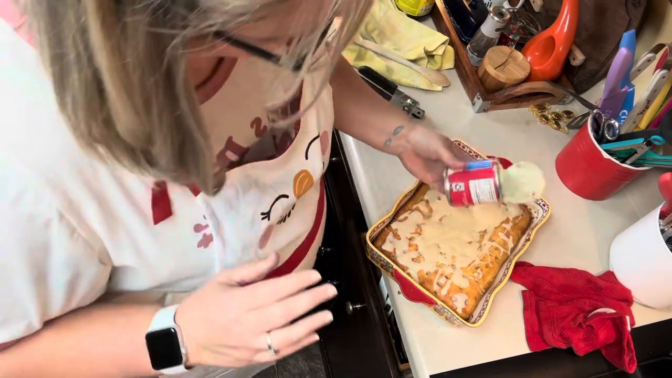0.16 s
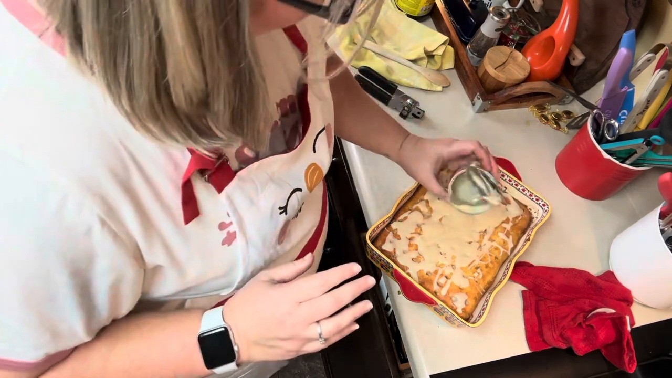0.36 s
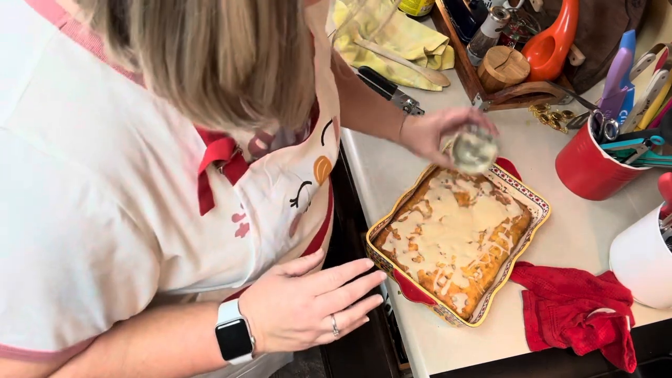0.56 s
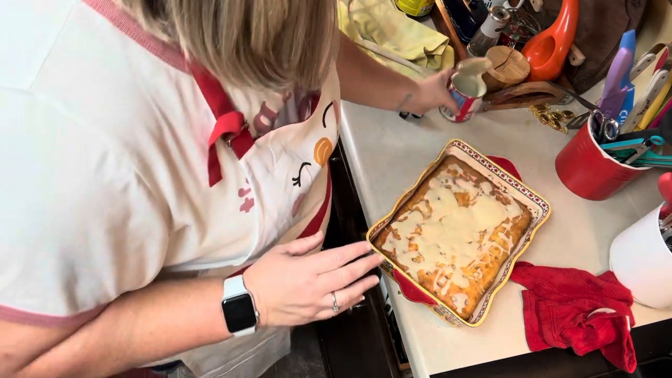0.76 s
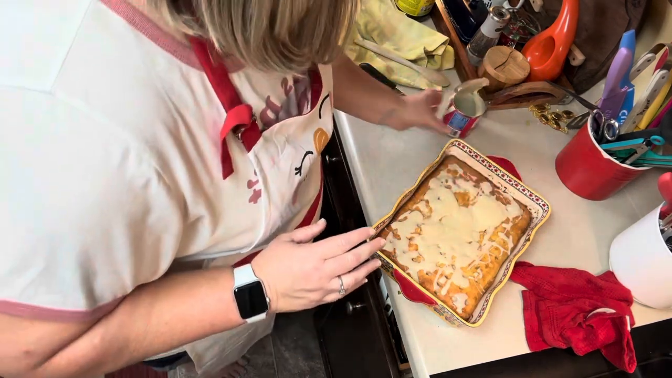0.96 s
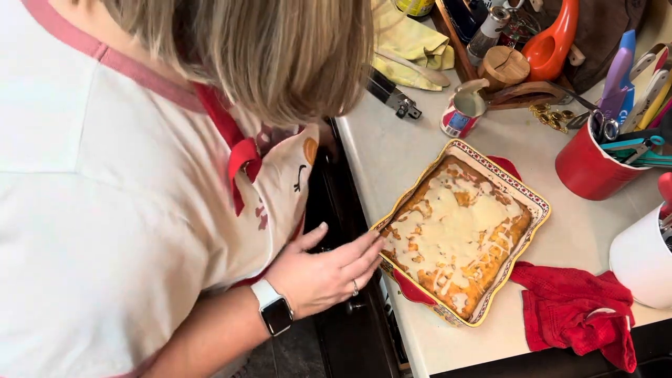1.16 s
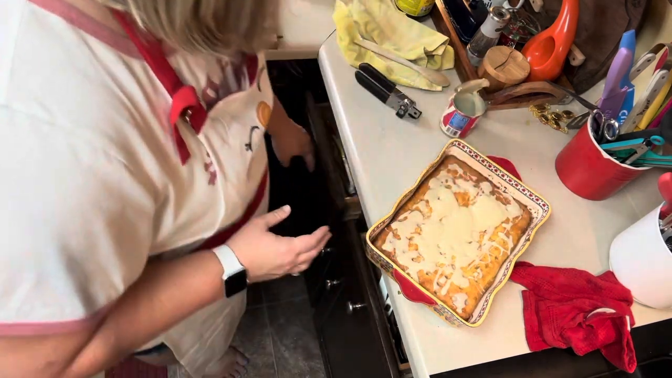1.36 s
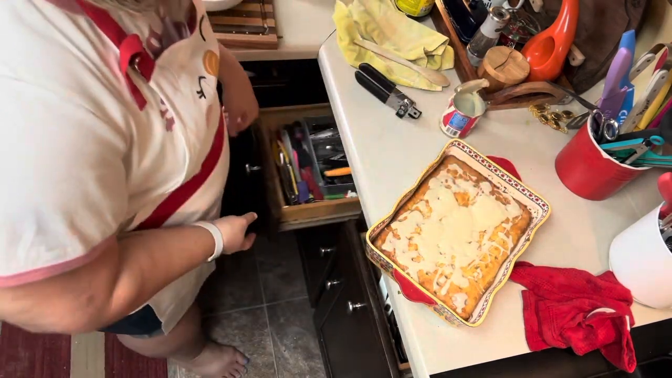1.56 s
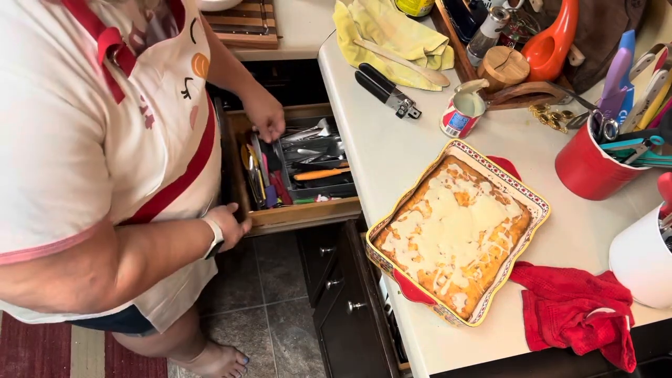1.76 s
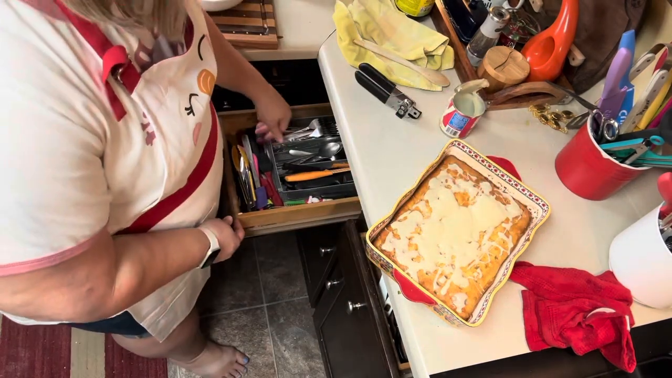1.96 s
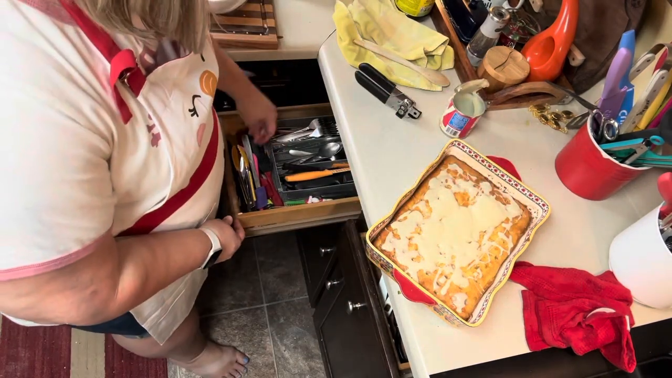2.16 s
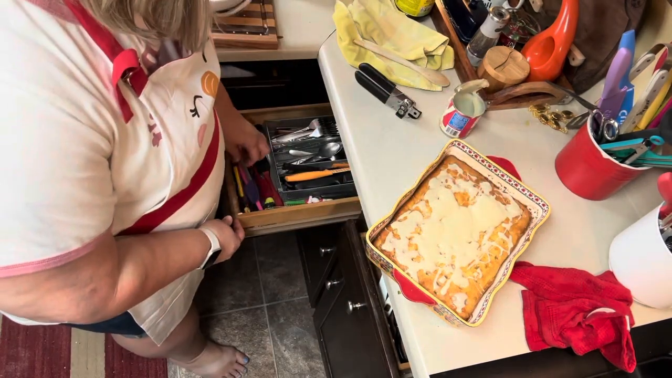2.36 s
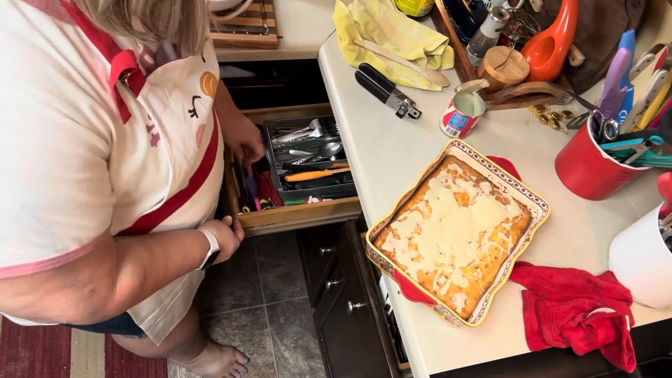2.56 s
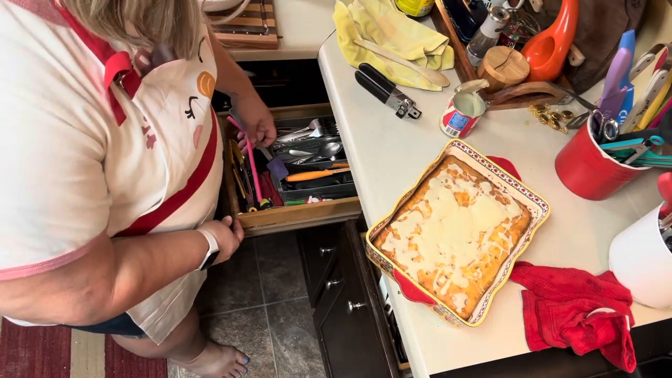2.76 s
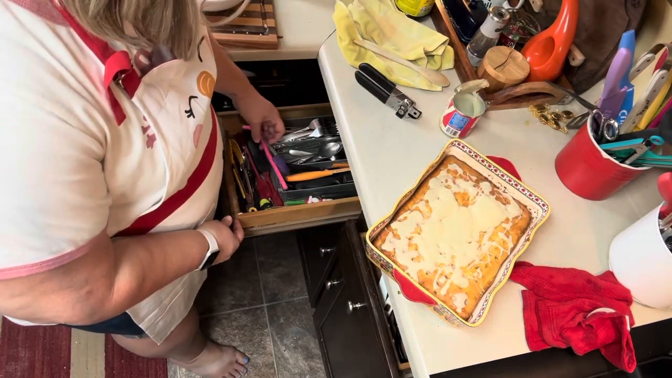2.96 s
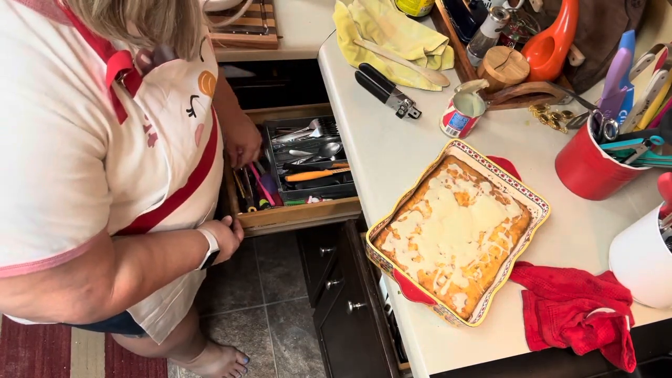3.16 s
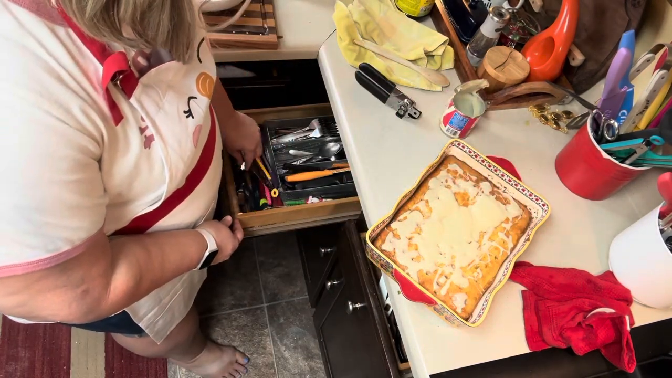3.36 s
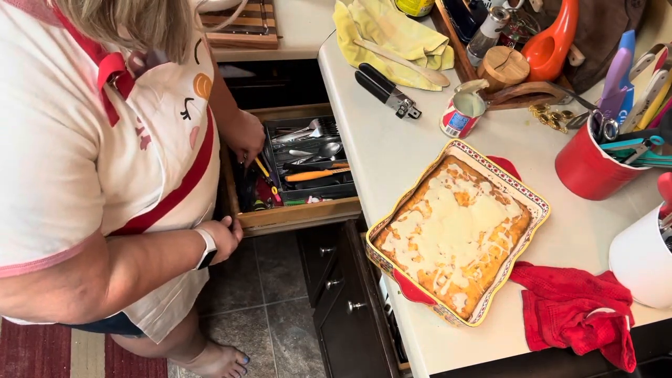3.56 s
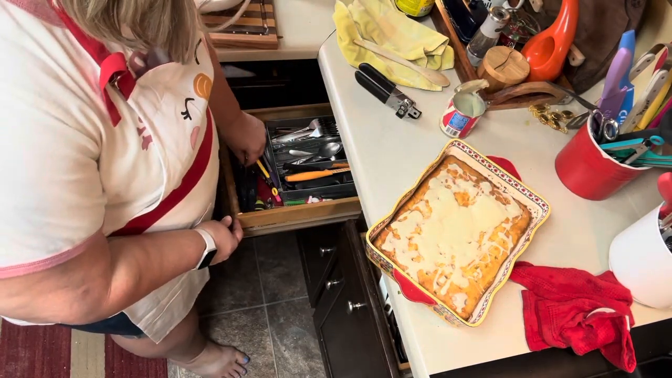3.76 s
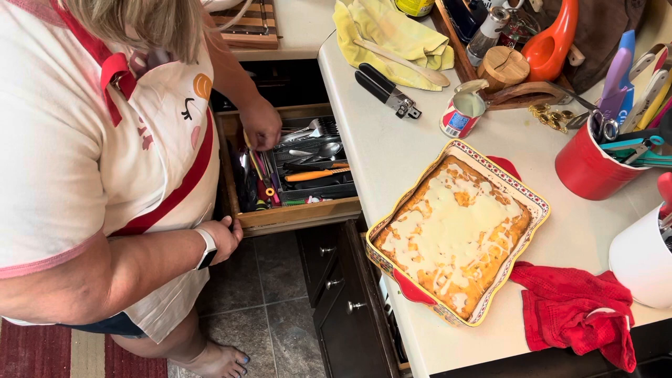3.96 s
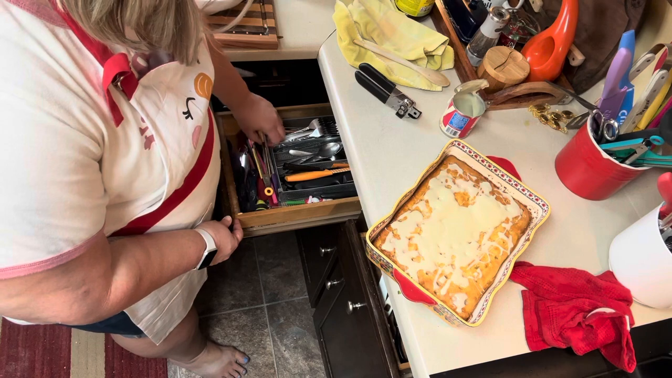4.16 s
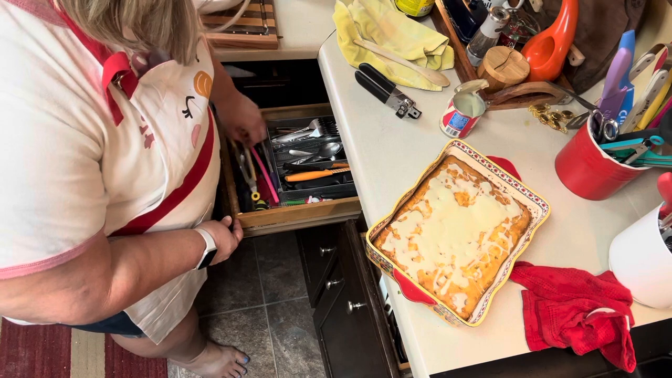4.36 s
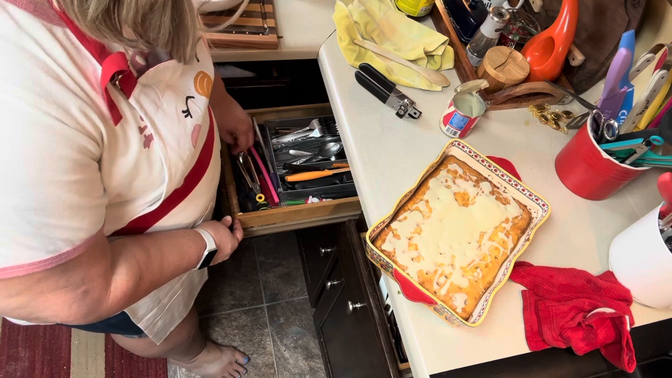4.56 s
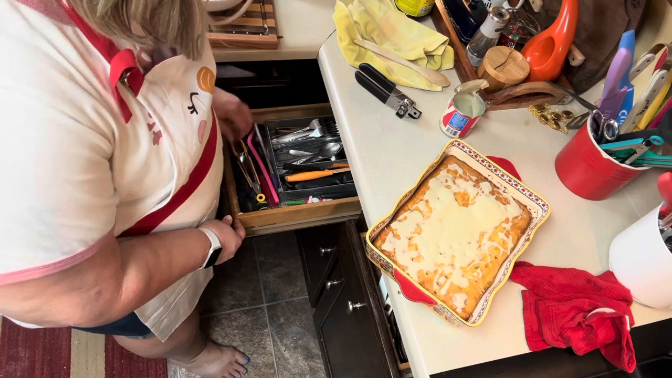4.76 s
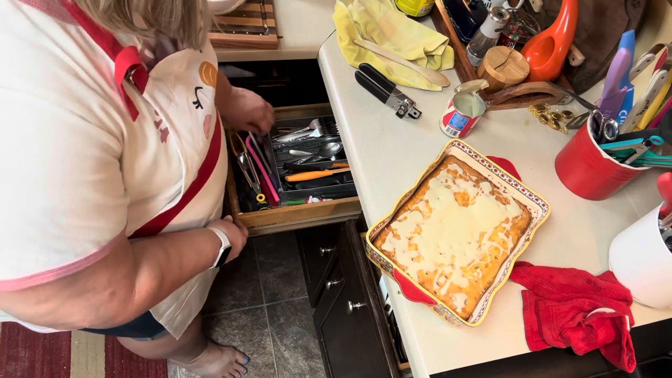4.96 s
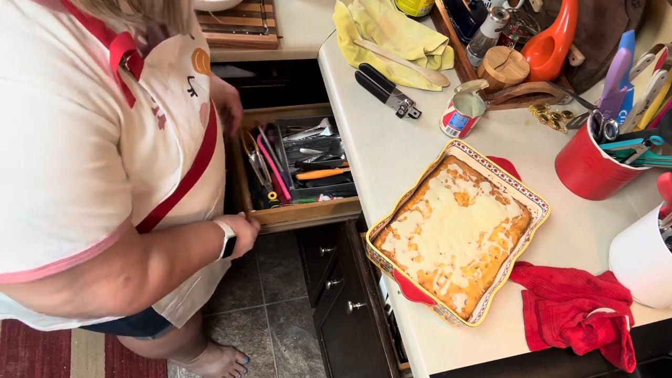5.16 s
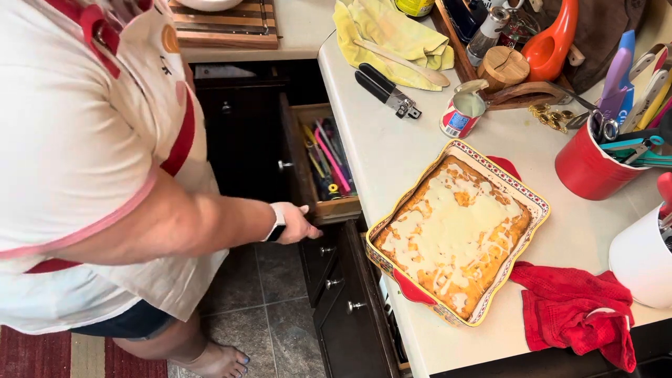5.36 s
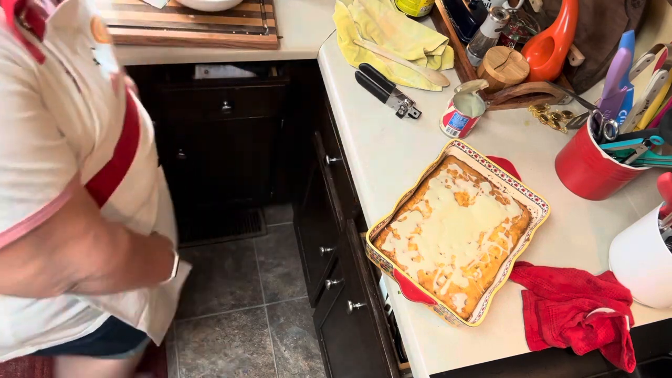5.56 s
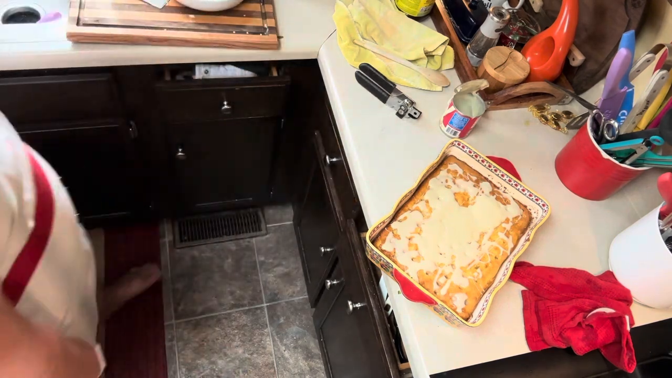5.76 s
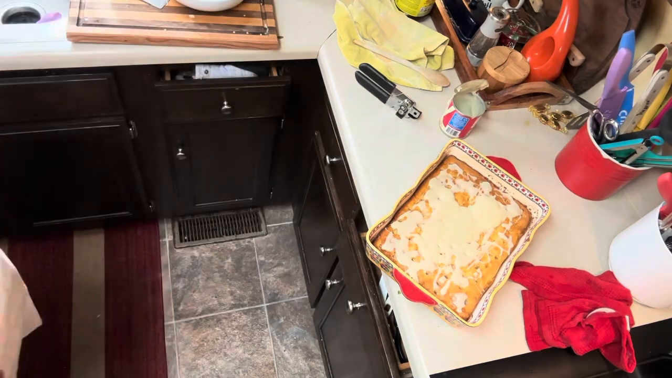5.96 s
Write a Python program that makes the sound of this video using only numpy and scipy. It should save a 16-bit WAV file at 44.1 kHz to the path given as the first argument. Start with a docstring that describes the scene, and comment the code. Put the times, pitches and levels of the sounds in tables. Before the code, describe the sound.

Kitchen drawer rummaging: a can knocks down, rollers rumble, cutlery rattles in uneven flurries, and a wooden drawer bangs shut with a boom.

```python
"""A hand rummages through metal and plastic utensils in a drawer tray, in a kitchen heard from a phone.
Before that a tin can is set down and the drawer rolls open; afterwards it is pushed shut with a slam.
Metal is a set of fading sine tones; knocks, scrapes and rustles are runs of tiny random clicks, filtered.
Soft steps and a shuffle go by. The small room answers every knock over a soft hum and hiss."""
import sys
import numpy as np
from scipy import signal
from scipy.fft import rfft, irfft, next_fast_len
from scipy.io import wavfile
from scipy.ndimage import uniform_filter1d

SR = 44100
rng = np.random.default_rng(int(sys.argv[2]) if len(sys.argv) > 2 else 0)


def persist_wave(psi):
    """Save psi, clipped to +-1, as 16-bit WAV."""
    counts = np.round(np.clip(psi, -1, 1) * 32767).astype(np.int16)
    wavfile.write(sys.argv[1], SR, np.atleast_2d(counts).T)


N = 265522  # length of the scene in samples
T = np.arange(SR // 4) / SR  # time within one knock, in seconds


def undb(db):
    """Turn decibels into a gain."""
    return 10 ** (np.asarray(db) / 20)


def unit(x):
    """Scale a sound to unit energy."""
    return x / np.sqrt(np.sum(x ** 2))


def blow(x, db):
    """Give a knock the energy of 10 ms of sound at the given level."""
    return unit(x) * undb(db) * np.sqrt(SR / 100)


def stroke(x, db, length_s):
    """Give a longer rub the energy of length_s seconds of sound at the given level."""
    return unit(x) * undb(db) * np.sqrt(abs(length_s) * SR)


def fade(t60):
    """Die away exponentially, by 60 dB in t60 seconds."""
    return np.exp(-np.log(1000) * T / max(t60, 1e-4))


def on_bins(points, size):
    """Read a (pitch_hz, value) curve at every frequency of a transform."""
    hz, value = np.transpose(points)
    bins_hz = np.arange(size // 2 + 1) * SR / size
    return np.interp(np.log(bins_hz + 1e-3), np.log(hz), value)


def colour(x, points):
    """Filter a sound to a (pitch_hz, level_db) curve, with no echo ahead of the sound."""
    size = 2 * next_fast_len(len(x) // 2 + 2048)
    # folding the cepstrum makes the filter causal
    cepstrum = irfft(np.log(undb(on_bins(points, size))))
    cepstrum[1:size // 2] *= 2
    cepstrum[size // 2 + 1:] = 0
    return irfft(rfft(x, size) * np.exp(rfft(cepstrum)))[:len(x)]


def convolve(x, response):
    """Pass a sound through a response, keeping its length."""
    return signal.fftconvolve(x, response)[:len(x)]


def add(track, s, sound):
    """Lay a sound into a track at time s in seconds."""
    start = int(s * SR)
    track[start:start + len(sound)] += sound[:N - start]


def ring(modes, scatter_db=0, detune=0, in_phase=False):
    """Sum fading tones; the point of contact changes their weights, the piece struck their pitch."""
    out = 0
    for k, (hz, db, t60) in enumerate(modes):
        weight, shift = rng.standard_normal(2)
        sign = 1 if in_phase else (-1) ** k
        tone = np.sin(2 * np.pi * hz * (1 + detune * shift) * T)
        out = out + sign * undb(db + scatter_db * weight) * fade(t60) * tone
    return out


def grains(size, spread_db):
    """Make dense tiny clicks of very uneven strength."""
    extra = np.minimum(rng.exponential(size=size), 5)
    return rng.standard_normal(size) * undb(spread_db * extra)


def even(x, width_hz):
    """Level the broad peaks and dips of a burst's spectrum, so that it is white."""
    power = uniform_filter1d(np.abs(rfft(x)) ** 2, max(int(width_hz * len(x) / SR), 1))
    hz = (np.arange(len(power)) + .5) * SR / len(x)
    return colour(x, np.column_stack([hz, -10 * np.log10(power / power.mean() + 1e-6)]))


def burst(t60):
    """Make a quick run of tiny contacts that dies away."""
    return even(grains(len(T), 1.5) * fade(t60), 400)


def focus(x, hz, focus_db):
    """Favour the range around a pitch: big pieces speak low, small ones high."""
    return colour(x, [(hz / 3, -focus_db), (hz, 0), (hz * 3, -2 * focus_db)])


def radiate(x, hz):
    """Cut the bass: a small object hardly radiates below its lowest modes."""
    return signal.sosfilt(signal.butter(2, hz, "high", fs=SR, output="sos"), x)


def thump(t60, hz):
    """Make a dead knock with no note of its own."""
    return radiate(focus(burst(t60), hz, 15), hz / 2)


def push(length_s):
    """Force of a contact, rising and falling: the longer it lasts, the less treble it excites."""
    return np.sin(np.pi * np.clip((T + 1 / SR) / max(length_s, 4 / SR), 0, 1))


def chatter(length_s, count=5):
    """One firm contact and weaker rebounds at random moments."""
    contacts = np.zeros(len(T))
    delay = rng.exponential(size=count)
    place = np.minimum(delay * abs(length_s) * SR, len(T) - 1).astype(int)
    contacts[place] = 0.65 * rng.standard_normal(count) * np.exp(-delay / 2)
    contacts[0] = 1
    return contacts


def walk(rate):
    """Wander slowly at random, about rate new values a second, with a spread of 1."""
    k = int(SR / rate)
    w = uniform_filter1d(np.repeat(rng.standard_normal(N // k + 1), k), k)[:N]
    return w / w.std()


# tones of the utensils, before scatter and damping: pitch_hz, relative level_db, t60_s
UTENSIL_MODES = [(1399.9, -8, 0.0657), (1610.6, -3, 0.041), (1747, 6, 0.064), (1834, 0.5, 0.1),
                 (2070, 2, 0.0306), (2440, 0, 0.08), (2863, 7, 0.053), (3340, -9, 0.016), (3875, 6, 0.049),
                 (4640, 3, 0.11), (5060, 3, 0.11), (5504, -12.5, 0.18), (7900, -2, 0.051)]
# thin tines and blades ring high above the rest: pitch_hz, relative level_db, t60_s
TINE_MODES = [(8000, 0, .13), (8550, -4, .12), (11800, 3, .13), (12450, -3, .09)]
# tones of the tray and the drawer bottom: pitch_hz, relative level_db, t60_s
TRAY_MODES = [(590, -1, 0.12), (683.5, 3.5, 0.096), (864, -2.5, 0.09703), (986, 3.5, 0.11),
              (1090, 3.5, 0.073), (1160, -21, 0.031)]
# colour of a plastic handle's clack: pitch_hz, relative level_db
CLACK = [(400, -36.5), (1000, -0.5), (1800, 3), (3000, -3), (4600, 3), (5600, 1.5), (7000, -19),
         (13000, -5), (16000, -26)]
# colour of an edge's tick: pitch_hz, relative level_db
TICK = [(1000, -26.5), (3000, -6), (5000, -8), (6500, -9), (9000, -7.5), (13000, -1), (14500, -13.5),
        (16000, -47)]
# the tray knocks under every clink, harder under the big, low pieces:
# level against the ring at TRAY_HZ, and its slope
TRAY_HZ, TRAY_DB, TRAY_DB_PER_OCTAVE = 2465.8, -20, -6


def clink(ring_db, hz, edge_db, metal_db=-16, clack_db=-13, tone_db=-17, tone_t60=.025, tick_db=-1,
          tines_db=-10, snap_db=7, clack_t60=0.026, chatter_s=.004, focus_db=9):
    """Pieces lying on each other ring only briefly; their edges tick and the tray under them knocks."""
    contacts = chatter(chatter_s)
    edge = fade(.035) + undb(snap_db) * fade(.003)
    tines = ring(TINE_MODES, scatter_db=5, detune=.012)
    metal = focus(ring(UTENSIL_MODES, scatter_db=3.5, detune=.035), hz, focus_db)
    # plastic handles give a dead clack in the same range
    clack = focus(colour(grains(len(T), 2.9) * fade(clack_t60), CLACK), hz, focus_db)
    tray = radiate(ring(TRAY_MODES, scatter_db=2, detune=.05, in_phase=True), 480)
    tick = colour(grains(len(T), 2.2) * edge, TICK)
    knock_db = ring_db + TRAY_DB + TRAY_DB_PER_OCTAVE * np.log2(hz / TRAY_HZ)
    # a short tone at the centre of the piece's ring
    tone = ring([(hz, 0, tone_t60)])
    layers = [
        (tone, ring_db + tone_db),
        (metal, ring_db + metal_db),
        (clack, ring_db + clack_db),
        (tray, knock_db),
        (tick, edge_db + tick_db),
        (tines, edge_db + tines_db),
    ]
    return sum(blow(convolve(contacts, sound), db) for sound, db in layers)


# one utensil strikes another; clink() offsets each layer from these levels:
# start_s, ring_db, pitch_hz (centre of the ring), edge_db
CLINKS = [(1.2718, -39, 4360, -68), (1.913, -42, 2100, -62), (2.2323, -36, 1170, -52),
          (2.2465, -28.5, 4205, -50), (2.305, -32, 2650, -47), (2.3473, -33, 6000, -37),
          (2.36, -27.5, 2840, -40), (2.373, -28, 1687, -41.5), (2.385, -29, 3500, -41),
          (2.3979, -30, 1500, -43), (2.606, -32, 5500, -52), (2.6475, -41.5, 1700, -49),
          (3.0606, -37, 900, -51), (3.169, -28.5, 2600, -42.5), (3.174, -29, 4900, -48),
          (3.2285, -32, 4380, -43.5), (3.2394, -30.5, 2200, -35.5), (3.2487, -24, 4450, -35.5),
          (3.267, -29.5, 4700, -49), (3.2812, -24.5, 2350, -52.5), (3.316, -28, 2103, -52),
          (3.3678, -26.5, 1756, -40), (3.3744, -24.5, 3800, -33.5), (3.5094, -35, 3957, -58),
          (3.5284, -31, 10500, -36), (3.562, -36.5, 4120, -52), (3.7255, -36, 5550, -60),
          (3.7776, -23.5, 3880, -38), (3.821, -30.5, 1720, -43.5), (3.829, -34, 4400, -50),
          (4.2815, -36, 2900, -66), (4.298, -38, 3400, -64), (4.324, -32.5, 1883, -53),
          (4.3687, -29, 4587, -50), (4.3825, -27.5, 1878, -40), (4.3993, -21, 3400, -34),
          (4.4063, -23, 4600, -27), (4.4237, -27, 3820, -31.5), (4.4685, -29, 2100, -29.5),
          (4.505, -33, 1800, -52), (4.527, -31, 4500, -35), (4.578, -37, 2100, -52),
          (5.2204, -43, 3290, -42.5), (5.6894, -38.5, 2990, -63)]
# a struck piece falls back about this much later, and more softly
FALL_S, FALL_DB = .014, -10


def utensils():
    """Each piece strikes its neighbour, then falls back."""
    out = np.zeros(N)
    for s, ring_db, hz, edge_db in CLINKS:
        add(out, s, clink(ring_db, hz, edge_db))
        fall_s = FALL_S * rng.uniform(.6, 1.4)
        add(out, s + fall_s, clink(ring_db + FALL_DB, hz, edge_db + FALL_DB))
    return out


# utensils drag over each other: start_s, end_s, level_db, pitch_hz (of the pieces)
SCRAPES = [(2.253, 2.306, -46.5, 2600), (2.351, 2.42, -45, 3500), (3.215, 3.262, -43.5, 4200),
           (3.286, 3.36, -47, 2400), (3.45, 3.524, -52.5, 3500), (3.727, 3.765, -53, 2300),
           (3.785, 3.844, -49.5, 2200), (4.359, 4.408, -41, 2300), (4.393, 4.433, -35.5, 4200),
           (4.443, 4.492, -39.5, 4000), (4.508, 4.552, -41, 4400)]


def scrapes(edge_db=-1, metal_db=-3, rough_db=4.5, focus_db=7):
    """Edges catch and slip in a dense run of tiny clicks that swells and dies away."""
    out = np.zeros(N)
    for start, end, db, hz in SCRAPES:
        slips = grains(len(T), rough_db) * push(end - start)
        metal = convolve(slips, ring(UTENSIL_MODES, scatter_db=1, detune=0.032))
        sound = unit(focus(colour(slips, CLACK), hz, focus_db))
        sound = sound + undb(edge_db) * unit(colour(slips, TICK))
        sound = sound + undb(metal_db) * unit(focus(metal, hz, focus_db))
        add(out, start, stroke(sound, db, end - start))
    return out


# a dragged piece jostles its neighbours: clinks per second, ring and tick against the scrape's level
JOSTLES_PER_S, JOSTLE_DB, JOSTLE_TICK_DB = 50, 8.5, -2


def jostles(scatter_db=2, scatter_octaves=.5):
    """Pieces of all sizes clink at random under each scrape, loudest at the height of the stroke."""
    out = np.zeros(N)
    for start, end, db, hz in SCRAPES:
        count = max(round((end - start) * JOSTLES_PER_S), 1)
        for k in range(count):
            along = (k + rng.random()) / count  # 0 to 1 through the stroke
            force, pitch = rng.standard_normal(2)
            level_db = db + scatter_db * force
            piece_hz = hz * 2 ** (scatter_octaves * pitch)
            sound = clink(level_db + JOSTLE_DB, piece_hz, level_db + JOSTLE_TICK_DB)
            add(out, start + (end - start) * along, np.sin(np.pi * along) * sound)
    return out


# handles drop on the drawer bottom: start_s, level_db, t60_s
HANDLES = [(2.281, -43, .05), (2.364, -44, .04), (3.777, -37, .025), (3.797, -43, .04), (3.823, -45, .06),
           (4.2815, -42, .035), (4.4625, -24, .012), (4.469, -35, .03)]
# colour of a handle's knock: pitch_hz, relative level_db
HANDLE_COLOUR = [(300, -38), (650, -3.5), (1100, 5), (1700, 9), (2400, 6.5), (3200, -7), (5000, -17.5),
                 (13000, -14), (16000, -45)]


def handle():
    """Handles give solid, dead knocks: short bursts with no ringing tones."""
    out = np.zeros(N)
    for s, db, t60 in HANDLES:
        add(out, s, blow(colour(burst(t60), HANDLE_COLOUR), db))
    return out


# the tray is nudged along the drawer bottom: start_s, end_s, level_db
NUDGES = [(3.044, 3.068, -45), (3.07, 3.101, -48.5), (4.205, 4.236, -51), (4.851, 4.865, -53.5),
          (4.935, 4.962, -51)]


def nudges(rough_db=2, rub_t60=0.06, grit_db=-10):
    """The tray sticks and slips, with a short hollow scuff."""
    out = np.zeros(N)
    # the hand on the tray damps its ring
    tray = radiate(ring(TRAY_MODES, in_phase=True) * fade(rub_t60), 380)
    tray = colour(tray, [(750, 2.5), (1200, -7)])
    for start, end, db in NUDGES:
        slips = grains(len(T), rough_db) * push(end - start)
        grit = unit(colour(slips, HANDLE_COLOUR))
        sound = unit(convolve(slips, tray)) + undb(grit_db) * grit
        add(out, start, stroke(sound, db, end - start))
    return out


# faint dull taps of things being handled, and a deeper layer under the handle's knock at 4.28 s: start_s,
# level_db, pitch_hz
TAPS = [(0.813, -51, 580), (2.704, -53, 640), (4.2815, -43, 1000), (4.732, -53, 930), (5.779, -46, 520)]


def taps(t60=.045):
    """Soft knocks on wood, each favouring the range around its pitch."""
    out = np.zeros(N)
    for s, db, hz in TAPS:
        add(out, s, blow(thump(t60, hz), db))
    return out


# the drawer hits its stop and rebounds: start_s, boom_db (cabinet), contact_s
SLAMS = [(5.5458, -46, 0.00022), (5.5492, -24.5, .0006), (5.5522, -26.5, 0.00089), (5.5595, -27, .0012),
         (5.5618, -18.5, 0.00252), (5.5681, -21.5, .0016), (5.579, -18, 0.0025), (5.594, -32, 0.0019),
         (5.662, -39.5, 0.0049)]
# tones of the cabinet: pitch_hz, relative level_db, t60_s
CABINET_MODES = [(79, -10, .14), (126, -0.5, 0.095), (178, 2, 0.08), (230, -1.5, 0.09), (268, 0, 0.05),
                 (328, 3.5, 0.06), (373, -1.5, 0.06), (450, -3, 0.06), (500, -3, 0.06), (574, 1, 0.06),
                 (660, -3, 0.06), (766, -5, 0.06), (980, 2, .045), (1200, -3, 0.04)]
# colour of wood cracking on wood: pitch_hz, relative level_db
SLAM_CRACK = [(150, -22), (470, 5.5), (780, 0.5), (1200, 3), (2000, -3.5), (3000, -4), (4000, 0.5),
              (5000, -3), (6500, -7.5), (9000, -12.5), (12800, -10), (14500, -35), (16000, -64)]
# the shorter the contact, the more it cracks: as loud as the boom at CRACK_CONTACT_S
CRACK_CONTACT_S, CRACK_DB_PER_HALVING = 0.0010854, 11


def slam(crack_t60=0.027, jangle_db=-13.5, jangle_s=0.011, jangle_t60=.12,
         thud_db=-5, thud_t60=.045, thud_hz=240):
    """Wood cracks on wood, the utensils jump and fall back, and the drawer's weight booms the cabinet."""
    out = np.zeros(N)
    cabinet = radiate(ring(CABINET_MODES, in_phase=True), 85)
    for s, boom_db, contact_s in SLAMS:
        crack_db = boom_db + CRACK_DB_PER_HALVING * np.log2(CRACK_CONTACT_S / contact_s)
        crack = colour(burst(crack_t60), SLAM_CRACK)
        # thrown together, the pieces damp each other
        metal = ring(UTENSIL_MODES, scatter_db=3, detune=.04) * fade(jangle_t60)
        jangle = radiate(convolve(chatter(jangle_s, count=14), metal), 2500)
        thud = unit(thump(thud_t60, thud_hz))
        boom = unit(convolve(push(contact_s), cabinet)) + undb(thud_db) * thud
        add(out, s, blow(crack, crack_db) + blow(jangle, crack_db + jangle_db) + blow(boom, boom_db))
    return out


# colour of the low rumble: pitch_hz, relative level_db
RUMBLE = [(40, -10), (80, -2), (150, -4), (240, -4.5), (320, -0.5), (450, -3.5), (750, -6), (1100, -10.5),
          (2000, -17), (5000, -47)]
# colour of the rustle of cloth: pitch_hz, relative level_db
RUSTLE = [(500, -1), (1500, -6), (3000, -1), (4700, -0.5), (6500, -5), (12500, -1.5), (15000, -34)]
RUSTLE_POWER = 0.56  # the rustle grows with this power of the speed


def glide(peak_s, run_up_s, coast_s, rumble_db, rustle_db):
    """Something speeds up smoothly, then coasts; its speed drives a low rumble and the rustle of cloth."""
    time = np.arange(N) / SR - peak_s
    run_up = np.cos(np.pi / 2 * np.clip(time / run_up_s, -1, 0)) ** 2
    speed = run_up * np.exp(-np.maximum(time, 0) / coast_s)
    rumble = unit(colour(grains(N, 3) * undb(2 * walk(35)), RUMBLE)) * np.sqrt(N)
    rustle = unit(colour(grains(N, 2.5) * undb(1.2 * walk(70)), RUSTLE)) * np.sqrt(N)
    return undb(rumble_db) * speed * rumble + undb(rustle_db) * speed ** RUSTLE_POWER * rustle


# the drawer is pulled out, then pushed in:
# peak_s (moment of greatest speed), run_up_s, coast_s (decay to 37 %), rumble_db, rustle_db
SLIDES = [(1.475, 0.23, .22, -47.3, -50.5), (5.34, 0.24, .2, -47.5, -46.5)]
# the rollers jolt on their runners: start_s, level_db, pitch_hz
JOLTS = [(1.338, -47, 300), (1.412, -46, 320), (1.454, -40, 480), (1.474, -43, 400), (1.535, -45, 350),
         (1.562, -44, 330), (1.661, -46, 330), (5.311, -38, 700), (5.321, -42, 360), (5.338, -41, 600),
         (5.444, -39, 350), (5.468, -41, 420)]
# tones of the open drawer box: pitch_hz, relative level_db, t60_s
BOX_MODES = [(310, -2, .05), (395, -7, .04), (520, -7, .04), (710, -6, .035), (1150, -12, .03)]


def slides():
    """Rollers rumble along the runners and shake the drawer box, until it meets its stop."""
    before_stop = np.arange(N) / SR < SLAMS[0][0]
    out = sum(glide(*move) for move in SLIDES) * before_stop
    for s, db, hz in JOLTS:
        box = radiate(ring(BOX_MODES, scatter_db=2, detune=.03, in_phase=True), 200)
        add(out, s, blow(focus(convolve(burst(.06), box), hz, 9), db))
    return out


# the can meets the counter, rim first, then flat: start_s, level_db (before the layer offsets)
CAN_BLOWS = [(0.8912, -24), (0.8927, -20.5), (0.8952, -31), (0.8982, -30), (0.9028, -30)]
# tones of the can on the counter, before detuning: pitch_hz, relative level_db, t60_s
CAN_MODES = [(148, -21.5, 0.227), (328.4, -18, 0.06), (441, -14, 0.07), (750, -7.5, 0.05), (950, -6, 0.055),
             (1115, -13, 0.03), (1421, -8, 0.009), (1850, 0, 0.013), (2230, 2, .009), (2880, -5, 0.022),
             (3280, -11, 0.013), (4200, -12, 0.04), (4990, -21, 0.05), (6520, -23, 0.1), (8980, -28, 0.038)]
# colour of the can's crack: pitch_hz, relative level_db
CAN_CRACK = [(100, -32), (300, -1), (700, 1), (1200, -1), (1850, 5.5), (2400, 5), (3100, 2), (4300, -9.5),
             (6000, -20), (11000, -21), (14500, -29), (16000, -36)]
# colour of the can shivering on its rim: pitch_hz, relative level_db
SETTLE = [(200, -14), (500, 1), (1000, 1), (2300, 0), (4200, -6), (6000, -14), (12500, -20), (16000, -45)]
# the can shivers on its rim as it settles: start, decay, level
SETTLE_S, SETTLE_T60_S, SETTLE_DB = .902, .13, -30


def can(ring_db=-4, crack_db=1.5, crack_t60=0.014):
    """The can rocks onto the counter in a few quick contacts; the hand damps its ring."""
    out = np.zeros(N)
    for s, db in CAN_BLOWS:
        crack = colour(burst(crack_t60), CAN_CRACK)
        tin = ring(CAN_MODES, scatter_db=1, detune=.005)
        add(out, s, blow(tin, db + ring_db) + blow(crack, db + crack_db))
    add(out, SETTLE_S, blow(colour(burst(SETTLE_T60_S), SETTLE), SETTLE_DB))
    return radiate(out, 161.46)


# steps on the floor: start_s, level_db
STEPS = [(0.978, -45.5), (5.336, -55), (5.974, -46.5)]


def steps():
    """Bare heels thud softly on the floor: three low, fading tones."""
    out = np.zeros(N)
    for s, db in STEPS:
        add(out, s, blow(ring([(72, -7.5, .25), (105, 13, 0.41), (150, -15, .12)]), db))
    return out


SHUFFLE_S = 5.772  # moment of greatest speed
# the stroke of the foot: run_up_s, coast_s (decay to 37 %), scuff_db, rustle_db
SHUFFLE = (0.16, 0.11, -48, -55.5)


def shuffle():
    """A foot shuffles round and clothes swing after it: one glide with a low scuff and a rustle."""
    return glide(SHUFFLE_S, *SHUFFLE)


# diffuse sound at the two microphone ports: pitch_hz, side_minus_mid_db
WIDTH = [(60, -34), (250, -31), (500, -15), (900, -4), (1500, -4.5), (4000, -3.5), (6000, -1), (8500, -3.5),
         (12500, -4)]


def spread(mid, side):
    """Diffuse sound: alike on both ports in the bass, much less alike in the treble."""
    side = colour(side, WIDTH)
    return np.array([mid + side, mid - side])


def kitchen(dry, tail_db=-9, tail_t60=0.24, early_db=-7, wall_s=.026, wall_db=-9, wall_t60=0.068):
    """Counter and cabinets reflect at once, ceiling and walls about 30 ms later, then a short tail."""
    def response():
        """Build one random set of reflections as fading noise."""
        # small things close by scatter little of the bass
        near = radiate(grains(len(T), 1.2) * fade(0.047) * (T > .001), 920)
        walls = np.roll(grains(len(T), 1.1) * fade(wall_t60), int(wall_s * SR))
        tail = rng.standard_normal(len(T)) * fade(tail_t60) * (1 - np.exp(-T / 0.00681))
        walls, tail = even(walls, 80), even(tail, 80)
        total = undb(early_db) * unit(near) + undb(wall_db) * unit(walls) + undb(tail_db) * unit(tail)
        return colour(total, [(100, -14.5), (300, 0.5), (1000, -3.5), (4500, -1), (8000, -1.5), (14000, -8)])
    return spread(convolve(dry, response()), convolve(dry, response()))


# colour of the steady room air: pitch_hz, relative level_db (per Hz)
AIR = [(30, -18), (70, -14.5), (115, 0.5), (170, -10), (230, -5), (350, -12.5), (750, -12.5), (1100, -13),
       (1900, -11.5), (3100, -16), (4700, -11), (6300, -18.5), (12600, -18), (14500, -52)]
AIR_DB = -53  # around which the level wavers


def air():
    """Ventilation hum and faint hiss: filtered noise, barely wavering."""
    mid, side = (unit(colour(rng.standard_normal(N), AIR)) * np.sqrt(N) for _ in range(2))
    return spread(mid, side) * undb(AIR_DB + 0.46 * walk(3.47))


def scene(can_room_db=-2.2, drawer_room_db=1, slam_room_db=0):
    """The can stands near the phone; the drawer lies lower, so more of it arrives by way of the room."""
    near, shut, background = can(), slam(), air()
    drawer = utensils() + scrapes() + nudges() + handle() + taps()
    drawer = drawer + slides() + steps() + shuffle() + jostles()
    to_room = undb(can_room_db) * near + undb(drawer_room_db) * drawer + undb(slam_room_db) * shut
    return near + drawer + shut + kitchen(to_room) + background


# phase lead of the left port over the right: pitch_hz, lead_radians
PORTS = [(100, 0), (450, -.05), (1100, -.4), (2400, -.3), (5600, -.45), (7000, .15), (8500, .4),
         (10500, 1.6), (12500, 2.3)]
# the phone's body shades its ports unequally: pitch_hz, left_minus_right_db
SHADE = [(700, 0), (1400, 1.8), (2100, -1.8), (2900, -.5), (4000, 2.8), (5600, -1.5), (8500, -.7),
         (13000, -.5)]
TOP_HZ = 16000  # the phone passes nothing much above this
CEILING = 1  # the phone rounds off peaks near this level


def record(dry):
    """The phone's ports differ in phase and level; it cuts deep bass, rounds peaks and cuts the top."""
    size = 2 * next_fast_len(N // 2 + 2048)
    # each port takes half of the difference
    lead = np.exp(.5j * on_bins(PORTS, size)) * undb(on_bins(SHADE, size) / 2)
    ports = irfft(rfft(dry, size) * np.array([lead, 1 / lead]))[:, :N]
    ports = signal.sosfilt(signal.butter(4, 60, "high", fs=SR, output="sos"), ports)
    ports = ports / (1 + (ports / CEILING) ** 4) ** .25
    return signal.sosfilt(signal.ellip(8, .2, 70, TOP_HZ, fs=SR, output="sos"), ports)


dry = scene()
out = record(dry)
persist_wave(out)
```